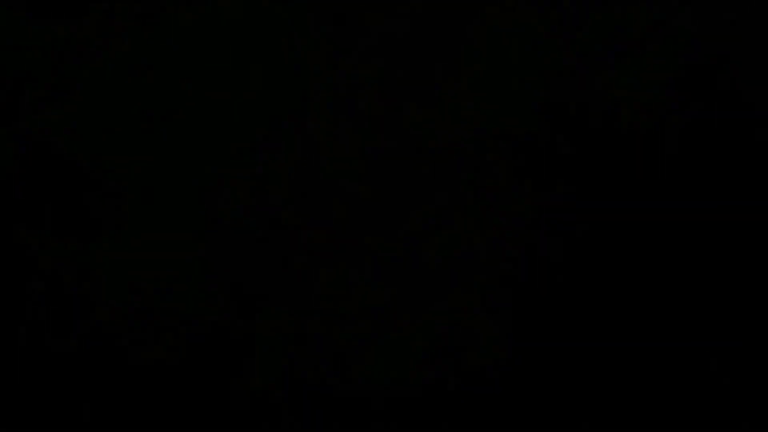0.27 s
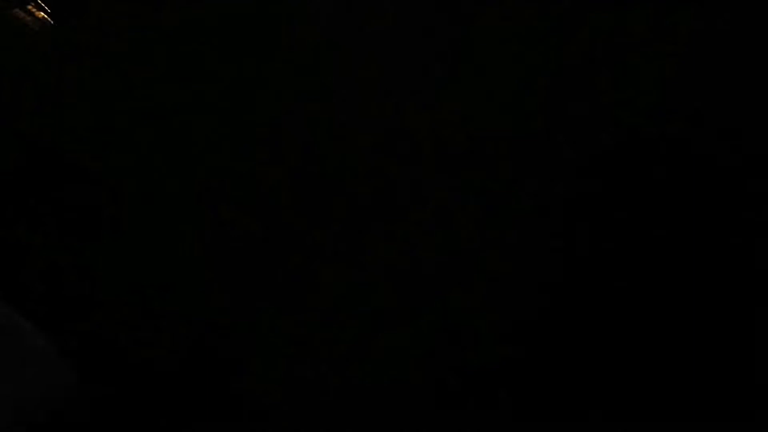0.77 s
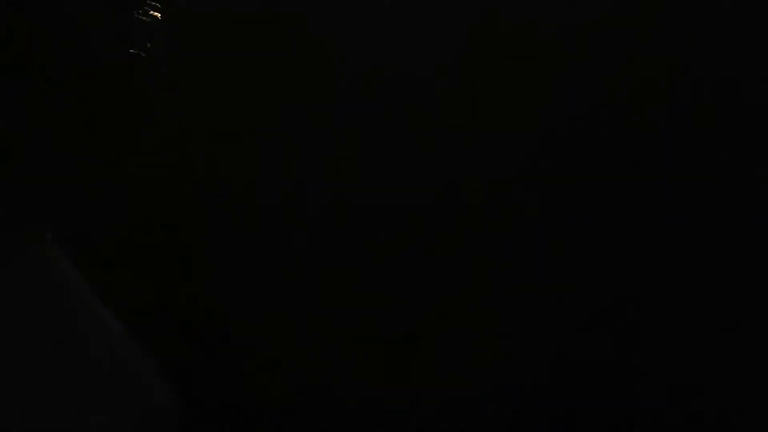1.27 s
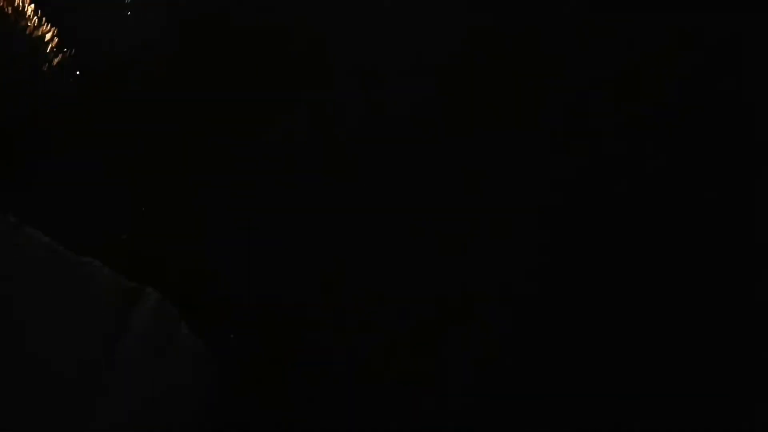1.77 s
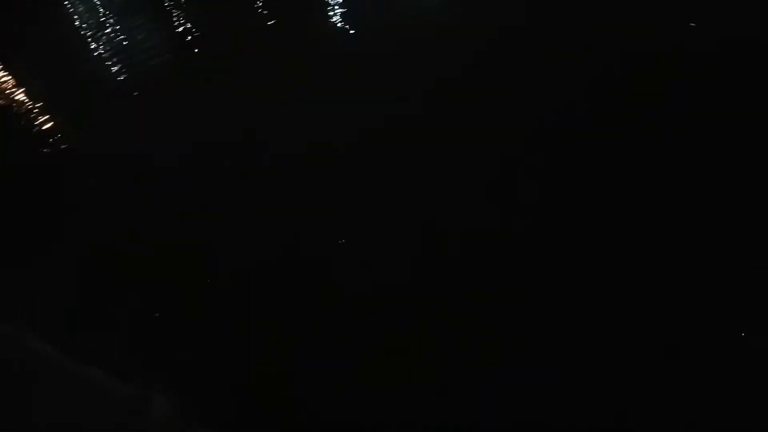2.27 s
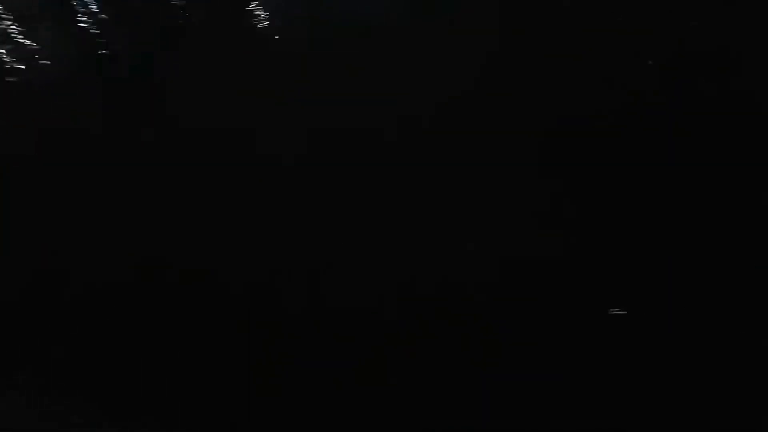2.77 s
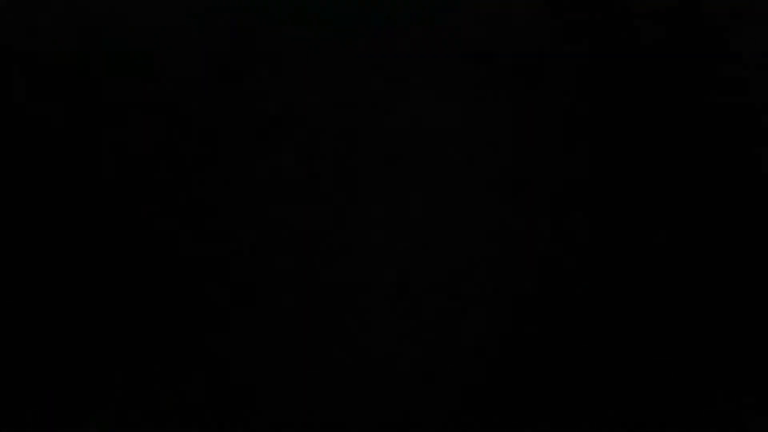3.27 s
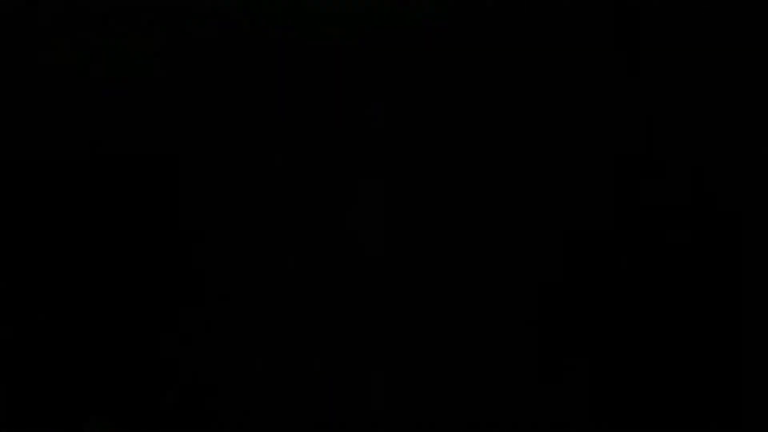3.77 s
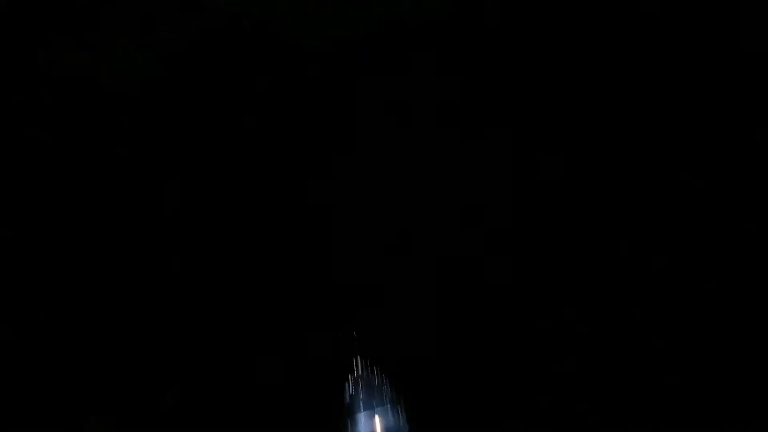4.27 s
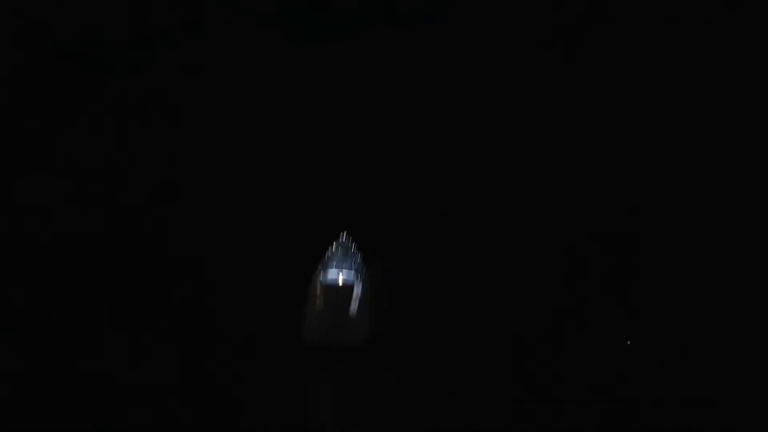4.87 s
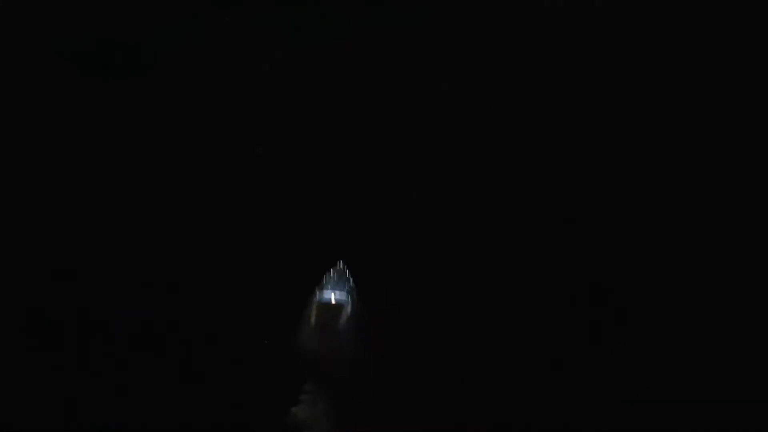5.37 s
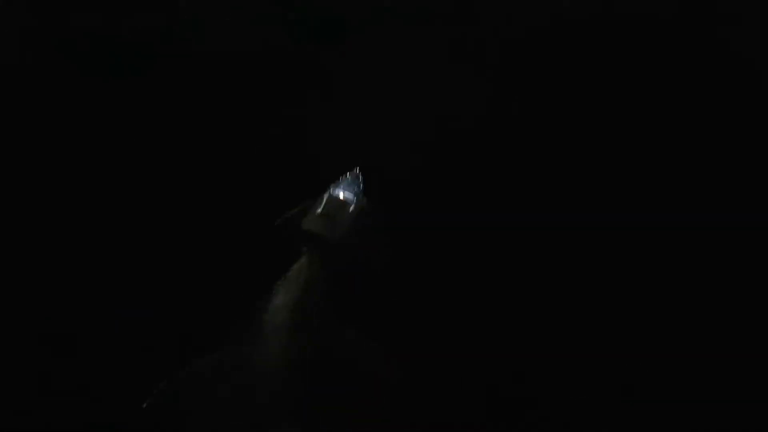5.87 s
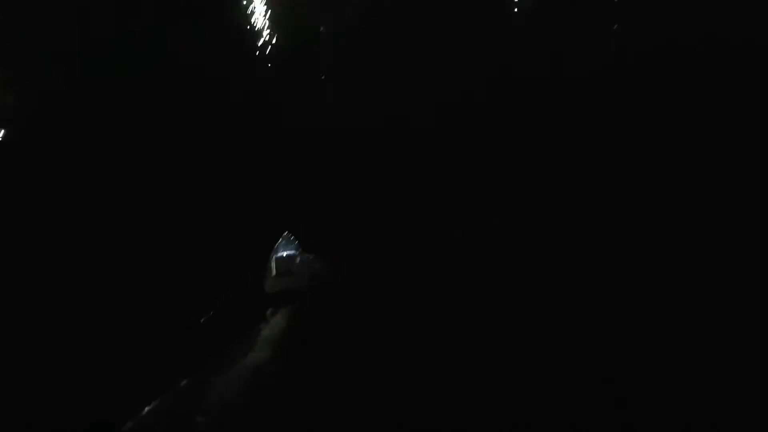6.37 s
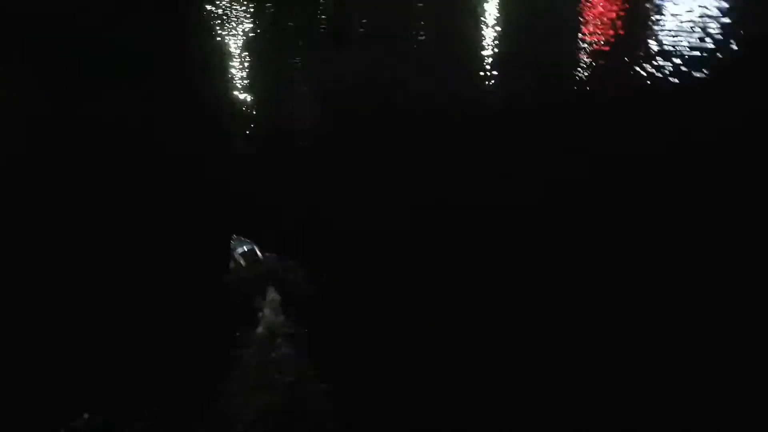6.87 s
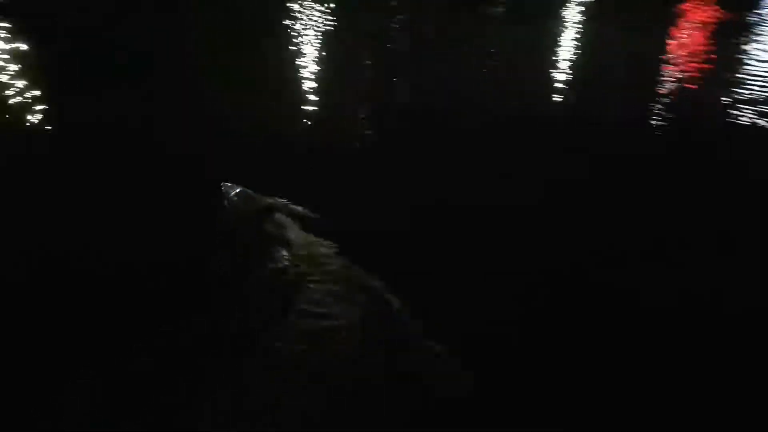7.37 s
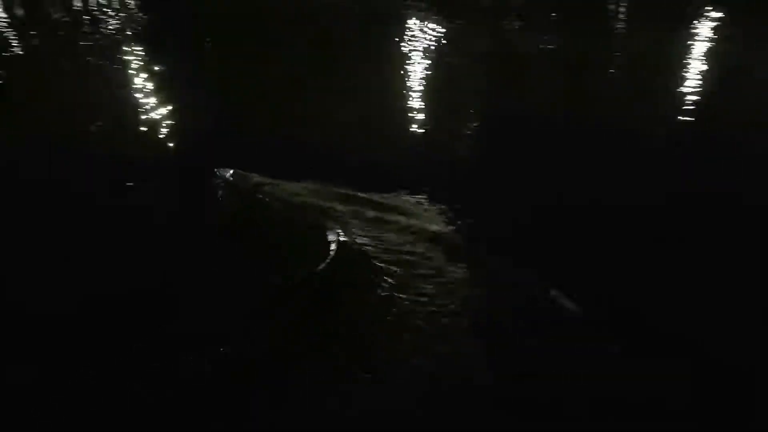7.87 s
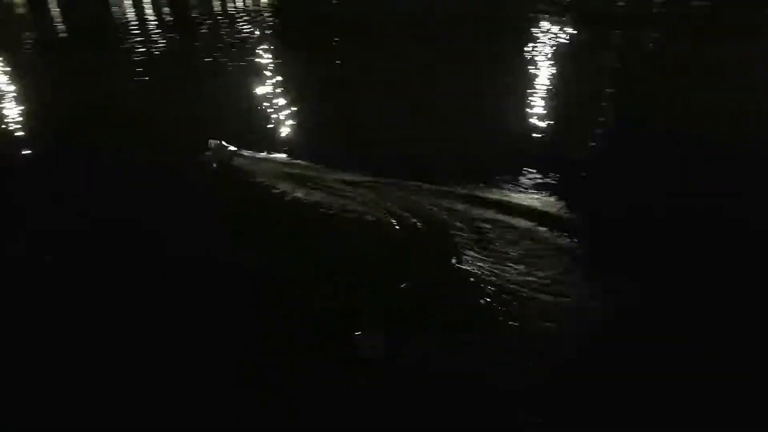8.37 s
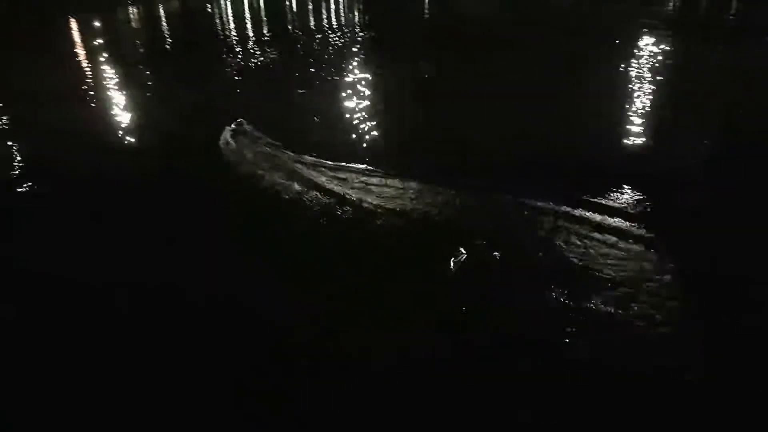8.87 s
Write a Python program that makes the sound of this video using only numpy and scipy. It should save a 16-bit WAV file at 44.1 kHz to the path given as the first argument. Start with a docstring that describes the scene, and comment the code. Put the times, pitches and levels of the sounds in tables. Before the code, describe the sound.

Outdoors beside a river at night, distant traffic murmurs and wind rumbles on the microphone. Small knocks, ticks and cloth rustles sound close by while a car hisses past. After about three seconds a model boat's electric motor starts abruptly, dips, then climbs in stepped whines with propeller churn and spray, settling at high speed and growing fainter as it draws away.

```python
"""A river at night, then a model boat opened up in steps and drawing away to the left.
Distant traffic and wind on the microphone are banded noise and last throughout; a car passes as two bands of
tyre roar. Close by, cloth rustles in swells of noise and damped rings make small knocks.
From 3.2 s the electric motor whines on fading harmonics of its shaft speed, and the propeller churns
and throws spray and mist in noise bands that follow its work; two short spells add faint side tones."""
import sys
import numpy as np
from scipy import signal
from scipy.fft import rfft, irfft, next_fast_len
from scipy.io import wavfile
from scipy.ndimage import uniform_filter1d, map_coordinates

SR = 44100
rng = np.random.default_rng(int(sys.argv[2]) if len(sys.argv) > 2 else 0)


def master_out(mix):
    """Clip the mix to full scale and print it as 16-bit PCM to the path in sys.argv[1]."""
    frames = np.transpose(np.atleast_2d(mix))
    ceiling = np.clip(frames, -1, 1)
    pcm = np.round(ceiling * 32767).astype(np.int16)
    wavfile.write(sys.argv[1], SR, pcm)


N = 401751

# Left-right likeness of the night air. Each row: frequency in Hz, correlation from -1 to 1.
AIR_LIKENESS = [(60, 0.94), (180, 0.92), (550, 0.6), (1640, -0.14), (4950, 0.051), (14900, -0.019)]
# Throttle moves of the motor. Each row: start in seconds, glide time in seconds, new whine pitch in Hz.
THROTTLE = [(3.2, .085, 150.2), (3.265, .08, 282.6), (3.415, .03, 235.8), (3.495, 0.034, 289.1),
            (3.6, 0.49, 290.6), (4.12, .085, 229.5), (4.249, 0.0822, 237.5), (4.52, 0.046, 265.9),
            (4.71, 0.046, 291.8), (4.87, 0.052, 310.4), (5.21, .09, 364.2), (5.48, 0.062, 376.7),
            (6.45, .06, 422.2), (7.115, .26, 513.6), (7.4, 0.32, 517), (7.8, 0.37, 509.5),
            (8.2, 0.39, 516.2), (8.7, 0.42, 510)]
CREEP_HZ = 100.2  # whine pitch as the shaft first turns
# Left-right likeness of the propeller's water noise. Each row: frequency in Hz, correlation from 0 to 1.
BOAT_LIKENESS = [(200, .95), (1000, .9), (2000, .8), (4000, .65), (8000, .5), (14000, .45)]


def from_db(db):
    """Turns dB into gain."""
    return 10 ** (np.asarray(db) / 20)


def rms_one(x):
    """Scales a signal to rms 1."""
    return x / np.sqrt(np.mean(x ** 2) + 1e-20)


def in_time(rows, before=None):
    """Draws table columns as curves over all samples, straight from row to row."""
    s, *columns = np.transpose(rows)
    t = np.arange(N) / SR
    return [np.interp(t, s, column, left=before) for column in columns]


def at_hz(points, hz):
    """Reads a spectrum on a log-frequency axis."""
    point_hz, value = np.array(points).T
    return np.interp(np.log(hz), np.log(point_hz), value)


def drift(rate_hz):
    """Slow random motion of spread 1: noise through two equal low-pass poles at rate_hz."""
    step = 40  # samples between points; the line between them is straight
    pole = np.exp(-2 * np.pi * rate_hz * step / SR)
    white = rng.standard_normal(N // step + 2002)
    slow = signal.lfilter([1], [1, -2 * pole, pole * pole], white)[2000:]  # settled part
    return np.interp(np.arange(N) / step, np.arange(len(slow)), rms_one(slow))


def banded_noise(spectrum, likeness, patchy_db, above_hz=None):
    """Third-octave bands of stereo noise, each flickering; rms about 1 before above_hz thins the lows."""
    out, power, together = 0, 0, drift(9.1)
    lowest, highest = spectrum[0][0], spectrum[-1][0]
    edges = lowest * 2 ** np.arange(0, np.log2(highest / lowest) + 1 / 3, 1 / 3)
    white = rng.standard_normal((2, 2, N))
    for k, (low, high) in enumerate(zip(edges, edges[1:])):
        band = signal.butter(2, [low, high], "band", fs=SR, output="sos")
        mid, side = signal.sosfilt(band, white[k % 2])  # neighbouring bands use separate noise
        hz = np.sqrt(low * high)
        alike = np.clip(at_hz(likeness, hz), -1, 1)
        gain = from_db(at_hz(spectrum, hz))
        power += gain ** 2 * (high - low) / SR * 2
        gain = gain * from_db(patchy_db * (0.61 * together + drift(17.5)))  # shared and own flicker
        if above_hz is not None:
            gain = gain / (1 + (above_hz / hz) ** 2.76)
        out = out + gain * (np.sqrt(1 + alike) * mid + np.sqrt(1 - alike) * side * [[1], [-1]])
    return out / np.sqrt(2 * power)


def traffic():
    """Distant traffic: a steady, gently flickering bed of mostly low and middle noise."""
    # Its colour. Each row: frequency in Hz, relative level in dB per Hz.
    spectrum = [(59, -47), (100, -25), (341, -3), (466, -10.5), (514, -4), (926, -15), (1870, -8.5),
                (2100, -14), (5000, -47), (6500, -71), (11000, -120)]
    return from_db(-44.5) * banded_noise(spectrum, AIR_LIKENESS, patchy_db=1.6)


def wind():
    """Wind on the microphone: low rumble that swells and sinks."""
    # Rumble colour. Each row: frequency in Hz, relative level in dB per Hz.
    spectrum = [(20, -42), (35, -11.5), (60, -3.5), (110, -6.5), (200, -9), (400, -16.5)]
    # Strength of the wind. Each row: time in seconds, level in dB.
    strength = [(0, -43), (.45, -42), (1.6, -47), (1.74, -54.5), (3.98, -58), (4.8, -43), (7.69, -43),
                (9.11, -46)]
    return from_db(in_time(strength)[0]) * banded_noise(spectrum, AIR_LIKENESS, patchy_db=2.0)


def car():
    """Tyre roar in two bands; the upper one is noise around a carrier that rises as the car goes by."""
    # The pass. Each row: time in seconds, low roar in dB, high roar in dB, centre of high roar in Hz.
    passing = [(0, -39, -71, 1372), (1, -47, -48.5, 1457), (1.35, -47, -44.5, 1582),
               (1.7, -50.5, -55, 1694), (2.2, -46, -57, 1700)]
    low_db, high_db, high_hz = in_time(passing)
    low_band = signal.butter(2, [740, 1100], "band", fs=SR, output="sos")
    low = signal.sosfilt(low_band, rng.standard_normal((2, N)))
    half_band = signal.butter(2, 200.0, fs=SR, output="sos")
    rumble = signal.sosfilt(half_band, rng.standard_normal((2, N)))
    high = rumble * np.cos(2 * np.pi * np.cumsum(high_hz) / SR)
    return from_db(low_db) * rms_one(low) + from_db(high_db) * rms_one(high)


def cloth_rustle():
    """Cloth rubbing close by: bright patchy noise in bell-shaped swells over a faint floor."""
    # Cloth colour. Each row: frequency in Hz, relative level in dB per Hz.
    spectrum = [(1500, -29), (2700, 10.5), (3600, 1), (5000, 2.5), (8300, -4), (12000, -10.5), (14500, -10)]
    # Single rubs. Each row: middle in seconds, half length in seconds, level in dB.
    rubs = [(0.126, 0.041, -54.5), (0.3, 0.12, -57), (0.62, 0.031, -71), (.9, .04, -64),
            (1.042, 0.032, -55.5), (1.15, .05, -55), (1.334, 0.014, -50.5), (1.426, .04, -59),
            (1.694, 0.055, -65), (2.63, .03, -66)]
    t = np.arange(N) / SR
    level = from_db(-63)  # cloth nearly still
    for middle, half, db in rubs:
        level = level + from_db(db) * np.exp(-((t - middle) / half) ** 2)
    noise = banded_noise(spectrum, AIR_LIKENESS, patchy_db=3.5)
    return level * noise * from_db([[-.5], [.5]])


def knocks():
    """Ticks and thuds of a hand on the casing: a damped ring on a puff of noise."""
    # Single hits. Each row: time in seconds, ring level in dB, ring pitch in Hz, decay in seconds.
    hits = [(0.057, -28, 1520, 0.0015), (.101, -44, 4950, .002), (0.167, -30.5, 1720, 0.0041),
            (.255, -42, 4280, .0015), (0.508, -45, 8300, 0.0018), (.769, -49, 12000, .001),
            (0.856, -29, 800, 0.0028), (1.014, -47, 8350, 0.0022), (1.054, -25.5, 378, 0.0035),
            (1.116, -32, 604, 0.0015), (1.118, -46, 8300, 0.00081), (1.319, -27, 433, .003),
            (1.333, -42, 8050, 0.0012), (1.828, -41, 3000, 0.0023), (1.835, -31.5, 1790, 0.0015),
            (1.996, -51, 6000, 0.00082)]
    out, t = np.zeros((2, N)), np.arange(SR // 20) / SR
    puffs = rng.standard_normal((len(hits), 2, len(t)))
    for (s, db, hz, decay), puff in zip(hits, puffs):
        start = round(s * SR)
        fade = np.exp(-t / max(decay, .0003))
        dull = signal.butter(2, min(1.25 * hz, 15000), fs=SR)  # noise about as dull as the ring
        crack = 0.64 * rms_one(signal.lfilter(*dull, puff))
        ring = np.sin(2 * np.pi * hz * t)
        out[:, start:start + len(t)] += from_db(db) * (ring + crack) * fade
    return out


def shaft_hz():
    """Whine pitch: each throttle move adds an S-shaped glide from the old speed to the new."""
    t, hz = np.arange(N) / SR, np.full(N, float(CREEP_HZ))
    old_speeds = [CREEP_HZ] + [row[2] for row in THROTTLE]
    for (s, glide, new), old in zip(THROTTLE, old_speeds):
        u = np.clip((t - s) / glide, 0, 1)
        hz += (new - old) * u * u * (3 - 2 * u)
    return hz


def side_tones(turn):
    """Two faint tones, one either side of the whine by a fixed spacing, gated into short spells."""
    # Spells. Each row: start in seconds, end in seconds, lower tone in dB, upper tone in dB.
    spells = [(3.33, 3.435, -48, -39), (3.526, 4.124, -44, -36)]
    spacing_hz, edge_s = 191, .02
    t, out = np.arange(N) / SR, np.zeros(N)
    beat = 2 * np.pi * spacing_hz * t
    for start, end, lower_db, upper_db in spells:
        gate = np.clip(np.minimum(t - start, end - t) / edge_s + .5, 0, 1)
        pair = from_db(lower_db) * np.sin(turn - beat) + from_db(upper_db) * np.sin(turn + beat)
        out += np.sqrt(2) * gate * pair
    return out


def whine(hz, pan_db, lag, rough):
    """Harmonics of the shaft pulse through the hull, roughened by the load of the water and fading at random."""
    # Load and distance. Each row: time in seconds, level in dB.
    whine_level = [(3.23, -55), (3.32, -33.5), (3.4, -32.4), (3.65, -32.5), (4.1, -34), (4.25, -36),
                   (4.7, -36.5), (4.8, -34.5), (5.2, -35), (5.4, -31.5), (5.55, -35), (6.0, -34),
                   (6.4, -33.4), (6.6, -36.5), (7.2, -37), (7.45, -35.5), (7.75, -32), (7.95, -35.5),
                   (8.1, -38), (8.55, -38), (9.1, -42)]
    # Waves slapping the hull. Each row: time in seconds, strength as a factor.
    wave_slaps = [(3.2, .3), (5.4, .5), (5.6, 1.1), (7.2, 1), (7.4, .7), (8, .7), (8.4, 1.5), (9.11, 1.2)]
    # How the hull radiates. Each row: frequency in Hz, gain in dB.
    hull = [(150, -32), (200, -11), (235, -3), (290, 4), (330, 3), (400, -4.5), (470, 2.2), (530, 7),
            (600, -2), (750, 8), (870, 7), (1150, 4.5), (1350, -.5), (1550, 7.5), (1800, 1), (2300, 0.5),
            (2700, -6.5), (3000, -6), (3400, -8.5), (3750, -13), (6500, -25)]
    # Relative level of each harmonic in dB, from the 1st to the 15th.
    harmonics_db = [12.5, 6, 3.5, 0.5, -0.5, -2.5, 1.5, -1.5, -1, -1, -2, -1, -2, -4, 0]
    # Clearest fades and swells, one list for each harmonic from the 1st.
    # Each row: middle in seconds, half length in seconds, change in dB.
    fades = [
        [(5.36, 0.062, 5), (5.75, 0.29, -2.5), (6.04, 0.023, -8), (6.25, 0.23, 2.5), (8.05, 0.043, -9),
         (8.16, 0.032, -11)],
        [(3.292, 0.016, 23.5), (3.38, .05, 5), (3.84, 0.16, -5.5), (4.27, 0.078, -13), (6.07, 0.037, 6.5),
         (6.29, 0.092, -9), (6.9, 0.028, -8), (7.69, 0.32, -9.5), (8.95, 0.11, -9.5)],
        [(3.25, 0.029, 27), (3.36, .1, -6.5), (3.84, 0.048, -8.5), (5.13, 0.037, -7), (5.48, 0.051, -15),
         (5.91, 0.13, -13), (6.41, 0.071, -10), (7.42, 0.082, 8.5), (7.73, 0.072, -17), (7.9, 0.073, 5)],
        [(4.07, .08, 4.5), (4.22, 0.029, -12), (5.44, 0.064, -16), (7.08, 0.098, 9), (8.67, 0.074, -20)],
        [(4.33, 0.032, -13), (5.97, 0.19, -10), (6.95, 0.051, -20)],
        [(3.45, 0.08, -11), (4.43, 0.04, -14), (5.75, 0.14, 6.5), (6.75, 0.094, 9), (8.1, 0.22, 15.5)],
        [(3.375, 0.036, 11), (3.48, 0.023, -17), (3.72, 0.11, -12), (4.05, .1, 5.5), (4.8, 0.077, 3),
         (5.14, 0.22, -17), (8.08, 0.31, -14)],
        [(3.58, 0.22, -1), (4.95, 0.18, 0.5)],
        [(3.5, 0.077, -8), (4.0, .15, 7.5), (4.27, 0.14, -9), (6.0, 0.34, 12.5)],
        [(3.63, 0.37, -12), (4.35, 0.32, 4.5)],
        [(3.63, 0.094, 10), (3.9, 0.15, -10), (5.03, 0.18, -22)],
        [(3.6, 0.3, -22)],
        [(3.8, 0.24, -9), (4.4, 0.13, 4), (4.63, .09, 12)],
    ]
    dulling_db_per_s = 0.37  # for each harmonic number above the 1st, as the boat draws away
    fading_db, fundamental_fading_db, fading_hz = 2.5, 1.05, 8  # the fundamental's scales with the chop

    t, level_db = np.arange(N) / SR, in_time(whine_level)[0]
    since_start = t - THROTTLE[0][0]
    running = np.clip(since_start / 0.036, 0, 1)
    chop = np.maximum(in_time(wave_slaps)[0], 0)
    wavering_hz = hz * (1 + .005 * chop * drift(12))  # wave slaps make the speed waver
    turn = 2 * np.pi * np.cumsum(wavering_hz) / SR
    speed_change = uniform_filter1d(np.abs(np.gradient(np.log(hz))) * SR, size=1000)
    out = np.zeros((2, N))
    for k, db in enumerate(harmonics_db, 1):
        db = db + level_db + at_hz(hull, k * hz) - dulling_db_per_s * (k - 1) * since_start
        db = db + (fundamental_fading_db * chop if k == 1 else fading_db) * drift(fading_hz)
        for middle, half, change_db in (fades[k - 1] if k <= len(fades) else []):
            db = db + change_db * np.exp(-((t - middle) / half) ** 2)
        shake = rough * min(k, 3) ** 0.86 * (.5 + chop)
        blur = .06 * max(k - 3, 0) * np.minimum(speed_change, 3)  # speed changes blur the overtones
        flutter = shake * (drift(30) + 1j * drift(30))
        flutter = flutter + blur * (drift(120) + 1j * drift(120))
        # height and phase are shaken, power kept
        load = (1 + flutter) / np.sqrt(1 + 2 * shake ** 2 + 2 * blur ** 2)
        phase = k * turn + rng.uniform(0, 2 * np.pi)
        line = np.sqrt(2) * from_db(db) * load * np.exp(1j * phase)
        # the highest overtones leave the hull nearer the middle
        late = 2 * np.pi * k * hz * lag / SR * (1 if k <= 9 else .4)
        lean_db = pan_db / 2 if k == 1 else drift(1.8) - .4  # water echoes tip each line its own way
        out += np.real([line * np.exp(-1j * late), line]) * from_db([lean_db, -lean_db])
    return (out + side_tones(turn)) * running


def churn(churn_db, hz):
    """Water churned by the propeller: broad noise whose low end thins as the shaft speeds up."""
    # Churn colour. Each row: frequency in Hz, relative level in dB per Hz.
    spectrum = [(210, -9), (300, -8.5), (500, 0.5), (800, 3.5), (1200, -1.5), (2000, -3.5), (3000, -8.5),
                (4500, -18), (7000, -20)]
    noise = banded_noise(spectrum, BOAT_LIKENESS, patchy_db=1.5, above_hz=0.77 * hz)
    return from_db(churn_db) * noise * from_db([[-.5], [.5]])


def spray(spray_db):
    """Spray thrown by the propeller: bright, patchy noise."""
    # Spray colour. Each row: frequency in Hz, relative level in dB per Hz.
    spectrum = [(2500, -5.5), (4000, 3.5), (5500, -3.5), (8300, -0.5), (12000, -31)]
    noise = banded_noise(spectrum, BOAT_LIKENESS, patchy_db=2.1)
    return from_db(spray_db) * noise * from_db([[-.6], [.6]])


def mist(spray_db, hz):
    """Fine mist: the airiest noise, following the spray and stronger at speed."""
    # Mist colour. Each row: frequency in Hz, relative level in dB per Hz.
    spectrum = [(7000, -25), (9500, 0), (12000, -0.5), (14500, -11)]
    against_spray_db, db_per_octave, reference_hz = -9.5, 9.5, 300
    mist_db = spray_db + against_spray_db + db_per_octave * np.log2(hz / reference_hz)
    noise = banded_noise(spectrum, BOAT_LIKENESS, patchy_db=1.63)
    return from_db(mist_db) * noise * from_db([[.7], [-.7]])


def boat():
    """Whine, churn, spray and mist; the left ear hears them a few samples late or early."""
    # Propeller wash. Each row: time in seconds, churn in dB, spray in dB.
    wash = [(3.2, -44, -59), (3.36, -29, -40), (3.51, -32, -45), (3.56, -30.5, -39), (4.15, -30, -39),
            (4.5, -37.5, -41), (4.68, -32.5, -41), (4.76, -33, -37.5), (5.15, -29.5, -40),
            (5.67, -29.5, -34), (5.93, -31, -37.5), (6.97, -29.5, -40), (7.26, -26, -38.5),
            (8.73, -31.5, -49), (9.11, -33, -54)]
    # Bearing. Each row: time in seconds, left over right in dB for the fundamental, left lag in samples.
    bearing = [(3.2, 0, 11.5), (3.97, -2, 4.5), (4.4, 0.5, 2.5), (5.62, -2, -2.5), (6.5, -4.5, -3.5),
               (6.67, -6.5, -3.5), (6.97, -5, -4), (7.3, 7.5, -4), (7.73, 5.5, -2.5), (8.55, 3, -4.5),
               (9.11, 1, -3.5)]
    churn_db, spray_db = in_time(wash, before=-120)
    pan_db, lag = in_time(bearing)
    hz = shaft_hz()
    tone = whine(hz, pan_db, lag, rough=0.094)
    water = churn(churn_db, hz) + spray(spray_db) + mist(spray_db, hz)
    water[0] = map_coordinates(water[0], [np.arange(N) - lag], order=3, mode="nearest")
    return water + tone


def scene():
    """Night air, passing car and close handling, with the boat on the river."""
    return traffic() + wind() + car() + cloth_rustle() + knocks() + boat()


def record(dry):
    """The microphone port lifts the treble near 8 kHz, dips just above and lifts again; the top is cut."""
    # Port colour. Each row: frequency in Hz, gain in dB.
    port = [(7000, 0), (8300, 2.5), (8800, 0.5), (9300, -4.5), (11000, 1.5), (13000, 5)]
    cutoff_hz = 14570
    size = next_fast_len(N)
    colour = from_db(at_hz(port, np.fft.rfftfreq(size, 1 / SR) + 1))  # 1 Hz up avoids log of zero
    coloured = irfft(rfft(dry, size) * colour, size)[:, :N]
    steep_cut = signal.ellip(12, .5, 90, cutoff_hz, fs=SR, output="sos")
    return signal.sosfilt(steep_cut, coloured)


dry = scene()
out = record(dry)
master_out(out)
```